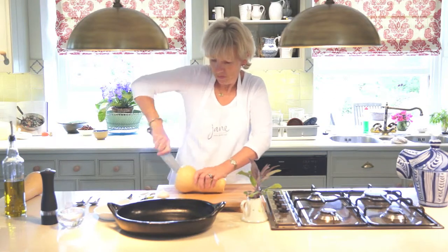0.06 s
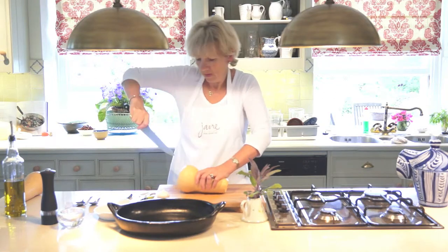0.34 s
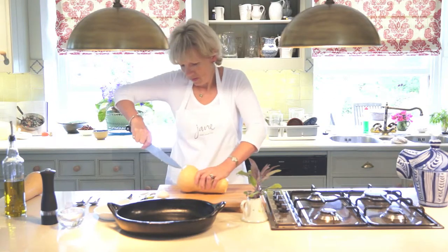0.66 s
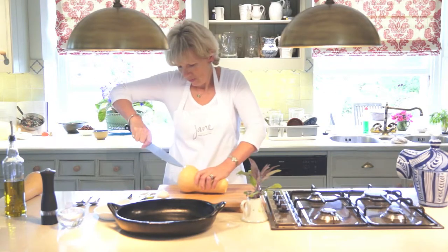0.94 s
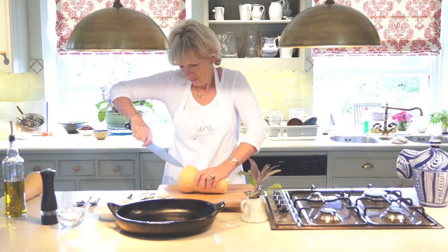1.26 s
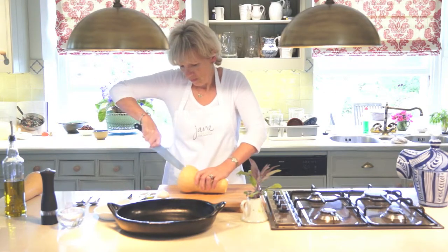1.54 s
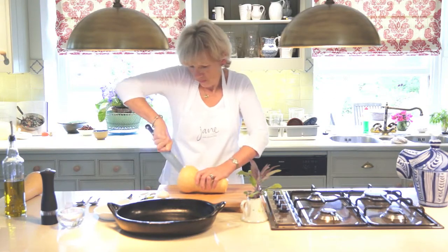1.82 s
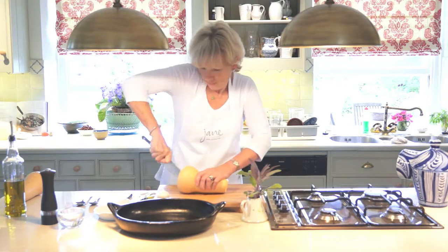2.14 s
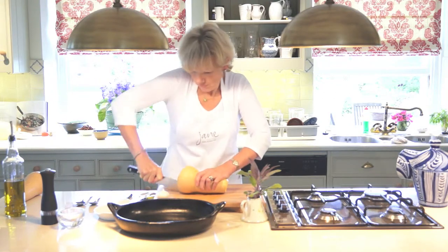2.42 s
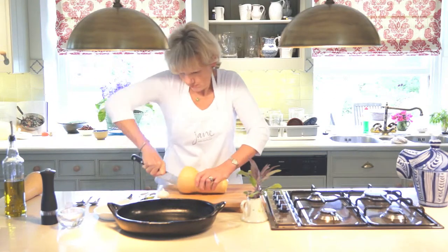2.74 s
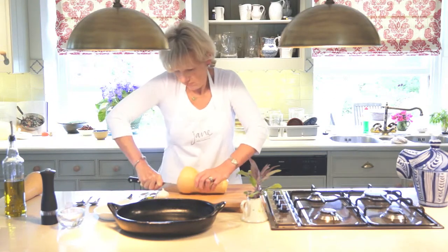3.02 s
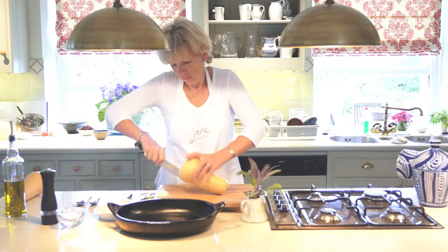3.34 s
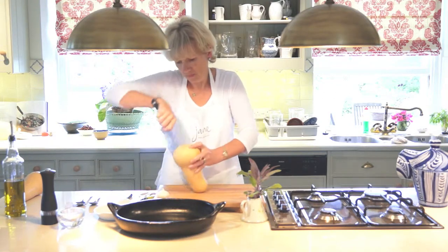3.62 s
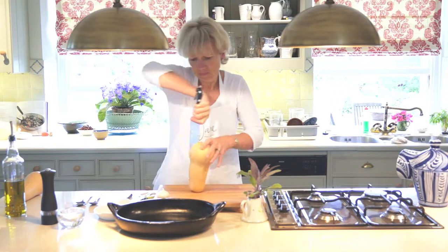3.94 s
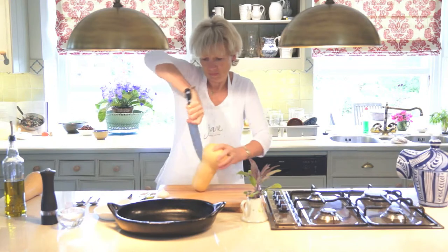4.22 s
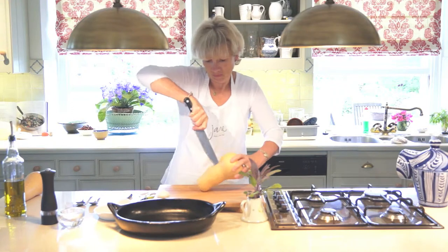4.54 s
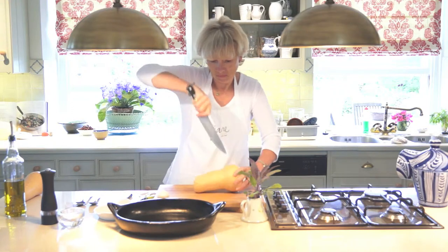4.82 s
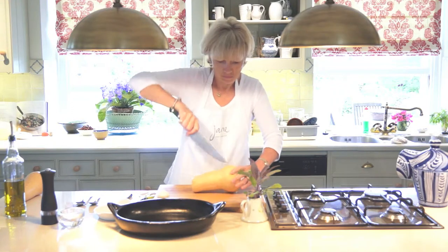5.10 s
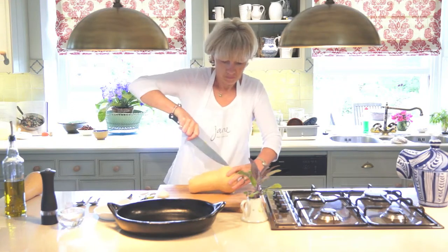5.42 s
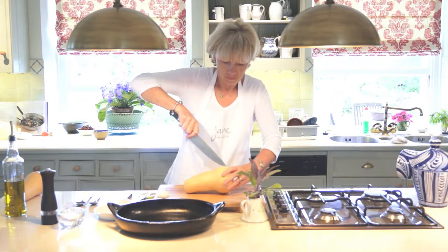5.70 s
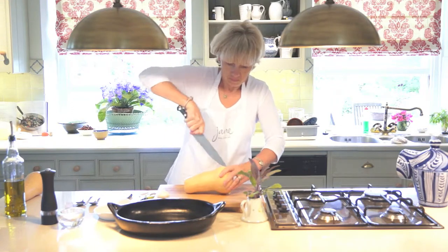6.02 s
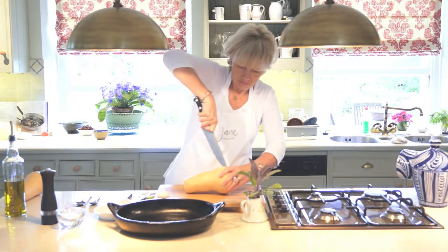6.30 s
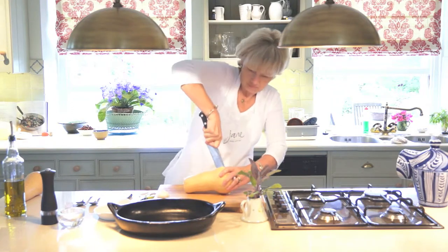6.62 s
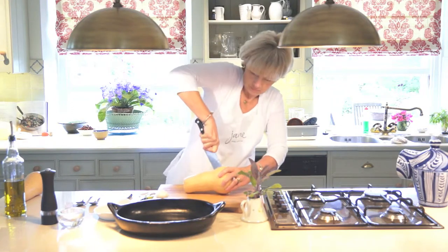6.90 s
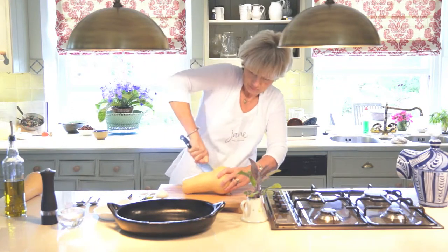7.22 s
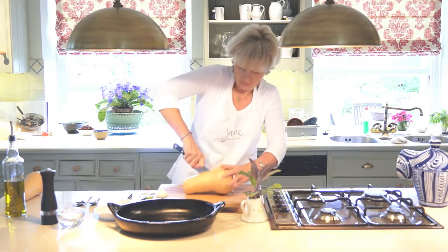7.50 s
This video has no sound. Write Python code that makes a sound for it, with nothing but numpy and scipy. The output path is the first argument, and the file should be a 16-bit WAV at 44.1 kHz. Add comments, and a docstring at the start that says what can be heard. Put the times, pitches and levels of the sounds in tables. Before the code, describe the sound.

Raw squash cracks and splits under a kitchen knife, thumping on a wooden chopping board in a slightly echoing kitchen.

```python
"""In a live kitchen, a large knife is worked through a raw squash on a wooden board. The flesh splits in sharp
cracks, and the heavy squash knocks and rubs on the board. Stick-slip friction makes the wedged blade judder and
scrape, and sets board and squash creaking; fibres rasp and cells burst. Lightly touched, the free blade rings
faintly. A bright microphone picks it all up from a little way off, with the room's echoes, over a soft steady
hiss."""
import sys
import numpy as np
from scipy import signal
from scipy.fft import rfft, irfft
from scipy.io import wavfile

SR = 44100
rng = np.random.default_rng(int(sys.argv[2]) if len(sys.argv) > 2 else 0)


def transcribe(signal):
    """Save signal, clipped to [-1, 1], as a 16-bit WAV file at the path in sys.argv[1]."""
    frames = np.atleast_2d(signal).T
    limited = np.clip(frames, -1, 1)
    pcm = np.round(limited * 32767).astype(np.int16)
    wavfile.write(sys.argv[1], SR, pcm)


N = 333043


def cracks(run_s=0.0004, bounce_s=0.0011, bounce_db=-5, after_s=0.0078, after_db=-20, spike_db=4):
    """Brittle fracture: a spike and a trail of small breaks excite the modes of squash and blade."""
    # splits: start_s, snap_db, snap_top_hz, flesh_db, blade_db (both rings relative to the snap)
    splits = [ (2.284, -25, 4000, 11, -3), (2.314, -31.5, 8000, 12, -12), (2.386, -34, 13100, 22, -23),
              (2.406, -20.5, 3760, 4, 3), (2.447, -22, 15000, 0, -14), (2.470, -20, 14000, 10, -22),
              (2.477, -21, 14000, 9, -33), (2.515, -29, 15000, -2, -25), (2.5655, -10.5, 16900, 5, -34),
              (2.9339, -5.5, 13500, 6, -15), (2.9746, -13.5, 14000, 0, -20), (3.0027, -8, 13800, 6.5, -1.5),
              (3.239, -29.5, 6000, 10, -24), (4.1727, -5, 10500, 11, -7), (4.1965, -9.5, 13100, 14, -23),
              (4.2085, 1, 8450, 12, 4), (7.1961, -5.5, 2370, 17.5, 11), (7.1971, -16.5, 14000, -12, -12),
              (7.368, -16, 4330, 10, -21)]
    # modes of the squash: pitch_ratio, width_hz, level_db
    flesh_modes = [(.54, 97, -4), (1, 132, 5), (1.24, 169, -10), (1.45, 174, -16)]
    # modes of the gripped blade: pitch_hz, width_hz, level_db
    blade_modes = [(1630, 80, -11), (2440, 1400, -7.5), (2830, 270, -5), (3170, 530, -9), (4800, 310, -9),
                   (5200, 510, -6.5), (6000, 2400, -12.5)]
    octaves_per_db = 0.017   # a smaller split rings higher
    out, t = np.zeros(N), np.arange(SR // 15) / SR
    jolt = signal.unit_impulse(len(t))
    run = np.exp(-t / run_s)
    bounce = from_db(bounce_db) * np.interp(t - bounce_s, t, run, left=0)   # off the nearest surface
    envelope = run + bounce + from_db(after_db) * np.exp(-t / after_s)
    for start_s, db, top_hz, flesh_db, blade_db in splits:
        _, piece_hz, _ = stroke_at(start_s)
        flesh_hz = piece_hz * 2 ** (-db * octaves_per_db)
        split = whiten(envelope * rng.standard_normal(len(t)) - from_db(spike_db) * jolt)
        snap = cut(split, 1100, "high", order=1) + from_db(blade_db) * resonate(split, blade_modes)
        modes = [(ratio * flesh_hz, width_hz, mode_db) for ratio, width_hz, mode_db in flesh_modes]
        flesh = from_db(flesh_db) * resonate(jolt, modes, flip=True)
        add(out, start_s, from_db(db) * (cut(snap, top_hz, "low") + flesh))
    return out


def knocks(level_db=1.5, damp_hz=3200, floor_hz=56):
    """Impact: softer contact excites less treble; heavy blows reach the board's lowest modes."""
    # squash and blade meet the board: start_s, force_db, contact_cutoff_hz, lowest_hz
    blows = [ (0.027, 10.5, 198, 54), (0.037, 9.5, 245, 55), (0.0385, -3, 1090, 454), (0.079, 8, 140, 55),
             (0.118, 11.5, 139, 61.4), (2.406, -10, 910, 100), (2.935, -12, 1310, 109),
             (3.003, -2.5, 1280, 192), (3.017, 1, 880, 70), (3.230, -6, 397, 90), (4.175, 2, 600, 283),
             (4.21, 8, 332, 310), (4.8442, 14.5, 1170, 58.7), (4.864, 7.5, 296, 50), (5.003, -1, 300, 130),
             (7.159, 5, 700, 150), (7.175, -4, 396, 80), (7.197, 12.5, 172, 60.4), (7.368, -11, 905, 70)]
    # modes of the board: pitch_hz, width_hz, level_db
    board_modes = [(66.6, 60, -2.5), (111.8, 29, 2.5), (131, 31, 5.5), (186, 51, 1), (238, 42, 4),
                   (320, 157, -3.5), (560, 300, -2), (934, 200, -3), (1098, 78, -1), (1494, 370, -14),
                   (1915, 77, -8), (2730, 220, -10)]
    out = np.zeros(N)
    wood = resonate(signal.unit_impulse(SR // 3), board_modes, flip=True)
    wood = cut(cut(wood, damp_hz, "low"), floor_hz, "high", order=6)
    for start_s, db, contact_hz, lowest_hz in blows:
        add(out, start_s, from_db(db + level_db) * cut(cut(wood, contact_hz, "low"), lowest_hz, "high"))
    return out


def pushing(judder_db=-7, rub_db=-6, rasp_db=-4, chatter_hz=90, chatter_db=2):
    """Friction: pushes of blade through squash, or squash over board, judder, rub, rasp and crackle."""
    # hands on knife and squash: start_s, swell_s, hold_s, force_db, wedge_db, bite_db (both re force)
    pushes = [ (1.358, .03, .02, -69, -16, -5), (1.45, 0.067, 0.1, -63, -7, -3),
              (1.711, 0.016, 0.11, -65.5, 7, -1), (1.914, 0.027, 0.045, -60, 10.5, 3),
              (2.101, 0.066, 0.18, -60.5, 6, -1), (2.369, 0.042, 0.093, -56.5, 2, -1),
              (2.645, 0.032, 0.062, -66, 4.5, 0.5), (2.71, .04, 0.014, -65, 10, -5),
              (2.864, 0.043, 0.011, -56.5, 2.5, -0.5), (3.215, 0.017, 0.032, -65, 3.5, 2),
              (3.367, 0.022, .02, -66.5, 0, -2.5), (3.503, 0.077, 0.14, -54.5, -3, -15),
              (3.83, .05, 0.16, -71, 0.5, 0), (5.36, 0.019, 0.021, -66, 0, -6),
              (5.449, 0.022, .02, -68.5, 9.5, -7), (6.103, .08, 0.12, -71.5, 4, -1),
              (6.27, 0.093, .04, -58.5, -4.5, -12), (6.418, 0.11, 0.12, -57, -11.5, -6.5),
              (6.777, 0.077, 0.021, -55, -6.5, -7), (7.003, 0.14, 0.13, -51.5, -3, -8),
              (7.337, 0.027, 0.017, -56, -5.5, -2.5), (7.436, 0.018, .02, -63.5, 3, -5)]
    # modes of the wedged and of the rubbed squash: pitch_hz, width_hz, level_db
    wedged_modes = [(66.5, 51, -6), (103, 67, -1.5), (164, 50, -0.5), (271, 145, -7.5)]
    rubbed_modes = [(545, 158, 3.5), (685, 436, 5), (891, 556, 5), (1090, 410, -1)]
    # spectra of tearing fibres and of bursting cells: frequency_hz, density_db
    rasp_spectrum = [(850, -1.5), (1300, 6.5), (2000, 2.5), (3200, 1.5), (4200, -8), (7000, -33)]
    crackle_spectrum = [(2600, 0), (4100, 1), (6500, -1.5), (9500, -5), (13300, -5.5), (16000, -13)]
    growth_db_per_s = 1   # more cells burst as the blade sinks deeper
    wedging, rubbing, rasping, crackling = np.zeros((4, N))
    for start_s, swell_s, hold_s, db, wedge_db, bite_db in pushes:
        force = from_db(db) * push_force(swell_s, hold_s)
        entry_s, _, entry_db = stroke_at(start_s)
        crackle_db = entry_db + growth_db_per_s * (start_s - entry_s)
        add(rubbing, start_s, force)
        add(wedging, start_s, force * from_db(wedge_db))
        add(rasping, start_s, force * from_db(bite_db))
        add(crackling, start_s, force * from_db(bite_db + crackle_db))
    judder = resonate(grains(per_s=220, spread_db=1), wedged_modes, flip=True)
    judder = from_db(judder_db) * wedging * rms_one(cut(judder, 620, "low"))
    rub = resonate(grains(per_s=740, spread_db=2.5), rubbed_modes, flip=True)
    rub = from_db(rub_db) * rubbing * rms_one(cut(cut(rub, 1660, "low"), 370, "high"))
    rasp = from_db(rasp_db) * rasping * coloured(grains(per_s=1100, spread_db=2.5), rasp_spectrum)
    crackle = crackling * coloured(grains(per_s=3500, spread_db=-1), crackle_spectrum)
    spurts = rms_one(from_db(chatter_db * wander(N, chatter_hz)))   # the contact catches and lets go
    return judder + rub + spurts * (rasp + crackle)


def push_force(swell_s, hold_s, release_s=0.037):
    """Exponential relaxation: the force of a push eases off after a smooth swell and a hold."""
    t = np.arange(SR // 2) / SR
    swell = np.sin(np.pi / 2 * np.minimum(t / swell_s, 1)) ** 2
    return swell * np.exp(-np.maximum(t - swell_s - hold_s, 0) / release_s)


def stroke_at(time_s):
    """Each piece has its own natural frequency; gives the row of the cut under way at time_s."""
    # the three cuts: start_s, piece_pitch_hz, first_crackle_db
    strokes = [(1.3, 676, -5), (3.5, 599, -8), (6.1, 530, -1.5)]
    return strokes[sum(time_s >= later[0] for later in strokes[1:])]


def creaks(waver=0.039, flutter_db=3.5, octave_db=-19):
    """Self-excited oscillation: stick and slip lock onto one resonance for a short, unsteady tone."""
    # creaks where stick-slip rings a resonance of board and squash: start_s, length_s, pitch_hz, level_db
    events = [(1.511, 0.21, 261.6, -69), (1.741, 0.027, 302, -54), (1.762, 0.047, 269.5, -56.5),
              (1.842, 0.031, 266, -57.5), (1.904, 0.04, 253, -55), (1.928, 0.0274, 296, -50.5),
              (2.186, 0.062, 271, -57.5), (2.271, 0.023, 302, -54.5), (2.744, 0.053, 181.5, -52.5)]
    out = np.zeros(N)
    for start_s, length_s, hz, db in events:
        size = int(length_s * SR)
        drift, grip = (wander(SR // 2, 115)[-size:] for _ in range(2))
        phase = 2 * np.pi * np.cumsum(hz * (1 + waver * drift)) / SR
        tone = np.sin(phase) + from_db(octave_db) * np.sin(2 * phase)
        add(out, start_s, from_db(db + flutter_db * grip) * signal.windows.tukey(size, .5) * tone)
    return out


def scrapes(crackle_db=-5, uneven=.3):
    """Sliding friction: a run of small slips on the rind drives one resonance of the blade."""
    # the blade skims the rind: start_s, length_s, level_db, pitch_hz, width_hz, slips_per_s
    skims = [(0.02, 0.27, -64, 1440, 2480, 900), (1.102, .04, -66.5, 4700, 1500, 900),
             (1.487, 0.26, -63.5, 1530, 503, 900), (2.096, 0.17, -66, 3140, 358, 70),
             (5.679, 0.084, -71, 4860, 500, 900), (7.084, 0.1, -58.5, 2700, 400, 900)]
    out = np.zeros(N)
    for start_s, length_s, db, hz, width_hz, per_s in skims:
        size = int(length_s * SR)
        cycles = np.cumsum(per_s / SR * (1 + uneven * wander(SR, 50)))[:size]
        slips = np.exp(-8 * (cycles % 1)) * rng.standard_normal(SR)[:size]   # each a brief rough puff
        ring = rms_one(resonate(slips, [(hz, width_hz, 0)]))
        crackle = from_db(crackle_db) * rms_one(cut(slips, 2600, "high"))
        add(out, start_s, from_db(db) * np.hanning(size) * (ring + crackle))
    return out


def tings():
    """Free vibration: after a light touch, the steel's inharmonic modes decay exponentially."""
    # touches on the blade: start_s, level_db
    touches = [(0.92, -67), (1.117, -57)]
    # modes of the free blade: pitch_hz, level_db, t60_s
    steel_modes = [(2160, -8.5, 0.1), (3040, -9, 0.091), (3817, -11, 0.26), (4650, -2, 0.19),
                   (5670, -14, 0.23), (7500, -13, 0.13), (14310, -13, .15)]
    out, t = np.zeros(N), np.arange(SR // 2) / SR
    for start_s, db in touches:
        for hz, mode_db, t60_s in steel_modes:
            ring = np.exp(-np.log(1000) * t / t60_s) * np.sin(2 * np.pi * hz * t)
            add(out, start_s, from_db(db + mode_db + rng.normal(0, 0.72)) * ring)
    return out


def kitchen(x, first_s=0.0026, build_s=0.00087, wet_db=1.5):
    """Reverberation: a diffuse field builds within milliseconds and dies band by band, treble first."""
    # the room's echoes: frequency_hz, level_db, t60_s
    room_bands = [(71, 6.5, 0.65), (143, -4.5, 0.68), (298, -1.5, 0.54), (665, -4.5, 0.57), (1270, 0, 0.56),
                  (2500, -3.5, 0.49), (4830, -4.5, 0.54), (7800, -6.5, 0.42), (11100, -11.5, 0.44),
                  (15900, -7, 0.24)]
    t, hz = np.arange(SR) / SR, np.fft.rfftfreq(SR, 1 / SR)
    white, echo = rfft(rng.standard_normal(SR)), 0
    edges_hz = np.geomspace(35, 18000, 25)
    build = 1 - np.exp(-np.maximum(t - first_s, 0) / build_s)
    for low, high in zip(edges_hz, edges_hz[1:]):
        centre_hz = np.sqrt(low * high)
        band = irfft(white * ((hz >= low) & (hz < high)), SR) * build
        band *= np.exp(-np.log(1000) * t / at_hz(room_bands, centre_hz, column=2))
        band *= np.sqrt(2 * (high - low) / SR) / np.linalg.norm(band)   # unit gain within the band
        echo = echo + band * from_db(at_hz(room_bands, centre_hz))
    return from_db(wet_db) * signal.fftconvolve(x, echo)[:N]


def hiss(level_db=-65.5, side_db=-6, side_rumble_db=-20):
    """Noise floor: room rumble and microphone hiss, partly in opposite phase in the two channels."""
    # steady background: frequency_hz, density_db
    floor_spectrum = [(13, -25), (22, 1), (125, 0), (174, -8), (223, -4), (319, -6), (356, -4), (432, -8.5),
                      (554, -9.5), (653, -12.5), (710, -9.5), (1380, -13), (1620, -14), (4260, -16.5),
                      (16000, -19.5)]
    mid = coloured(rng.standard_normal(N), floor_spectrum)
    side = from_db(side_db) * rng.standard_normal(N)
    side += from_db(side_rumble_db) * wander(N, 40, order=1)
    return from_db(level_db) * (mid + side * np.array([[1], [-1]]))


def resonate(x, modes, flip=False):
    """Modal superposition of damped resonators; flip alternates their signs, filling the valleys."""
    out = 0
    for k, (hz, width_hz, db) in enumerate(modes):
        radius = np.exp(-np.pi * width_hz / SR)
        poles = [1, -2 * radius * np.cos(2 * np.pi * hz / SR), radius ** 2]
        gain = (-1) ** (k * flip) * from_db(db) * (1 - radius ** 2) / 2
        out = out + gain * signal.lfilter([1, 0, -1], poles, x)
    return out


def grains(per_s, spread_db):
    """Shot noise: random clicks of uneven size on a faint bed of white noise."""
    sizes = from_db(spread_db * np.minimum(rng.exponential(1, N), 4)) * rng.choice([-1, 1], N)
    return rms_one(sizes * (rng.random(N) < per_s / SR)) + 0.16 * rng.standard_normal(N)


def whiten(burst):
    """Spectral whitening: keeping only the phase gives a colourless snap that starts at once."""
    flat = irfft(np.exp(1j * np.angle(rfft(burst))), len(burst))
    return flat * (np.arange(len(burst)) < len(burst) // 2)


def coloured(x, spectrum):
    """Spectral shaping by a smooth curve; rms 1."""
    return rms_one(irfft(rfft(x) * from_db(at_hz(spectrum, np.fft.rfftfreq(N, 1 / SR))), N))


def wander(size, hz, order=2):
    """Random fluctuation: low-passed noise; rms 1."""
    return rms_one(cut(rng.standard_normal(size), hz, "low", order))


def cut(x, hz, kind, order=2):
    """Low-pass or high-pass filter."""
    return signal.sosfilt(signal.butter(order, np.clip(hz, 10, .47 * SR), kind, fs=SR, output="sos"), x)


def at_hz(points, hz, column=1):
    """Interpolation of a table column along log frequency."""
    points = np.array(points)
    return np.interp(np.log(np.maximum(hz, 1)), np.log(points[:, 0]), points[:, column])


def add(track, start_s, sound):
    """Superposition of a sound on the track at start_s."""
    start = max(round(start_s * SR), 0)
    track[start:start + len(sound)] += sound[:N - start]


def from_db(db):
    """Amplitude ratio of a level."""
    return 10 ** (np.asarray(db) / 20)


def rms_one(x):
    """Normalisation to unit power."""
    return x / np.sqrt(np.mean(x ** 2) + 1e-20)


def scene():
    """Direct and reverberant sound sum at a microphone whose resonances brighten the treble."""
    # presence peaks of the microphone: centre_hz, width_hz, added_db
    presence_peaks = [(6240, 650, -7), (13100, 1500, -3)]
    direct = cracks() + knocks() + tings() + pushing() + creaks() + scrapes()
    air = direct + kitchen(direct)
    return air + resonate(air, presence_peaks) + hiss()


def record(dry):
    """Band limiting: a steep low-pass removes the highest treble."""
    cutoff_hz = 16100
    return signal.sosfilt(signal.ellip(10, .1, 80, cutoff_hz, fs=SR, output="sos"), dry)


dry = scene()
out = record(dry)
transcribe(out)
```